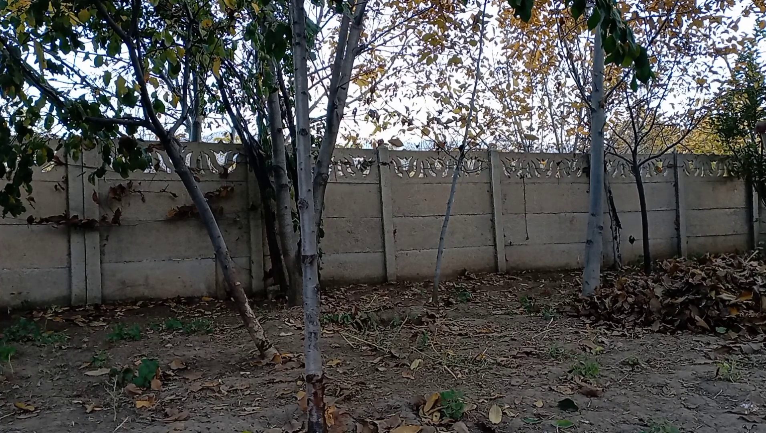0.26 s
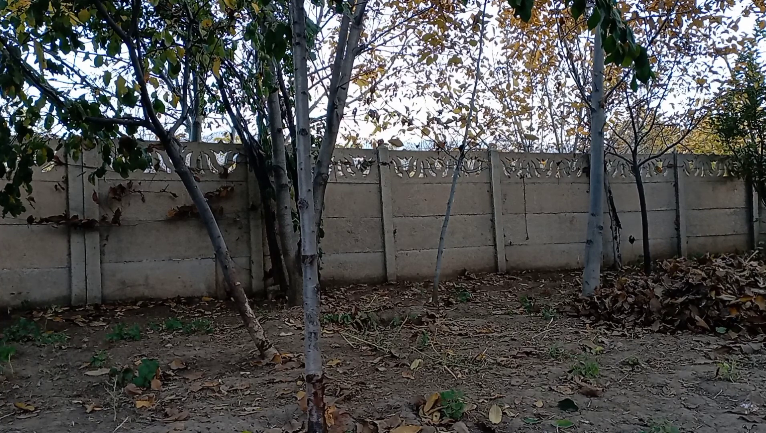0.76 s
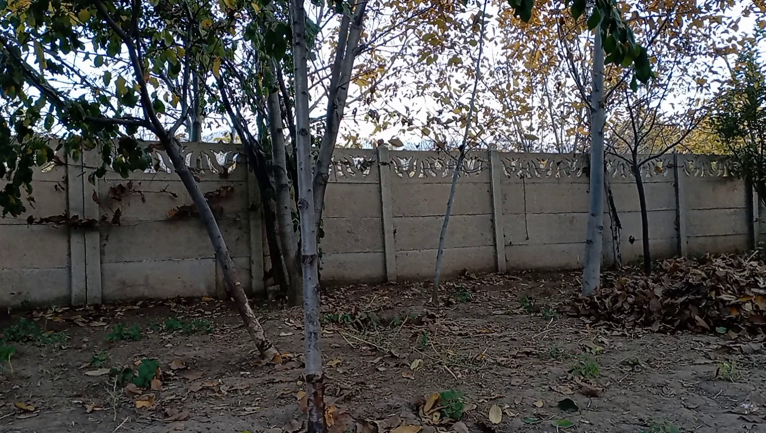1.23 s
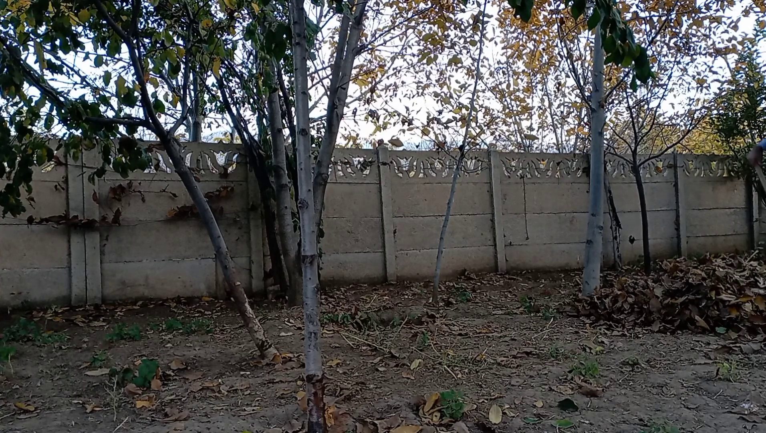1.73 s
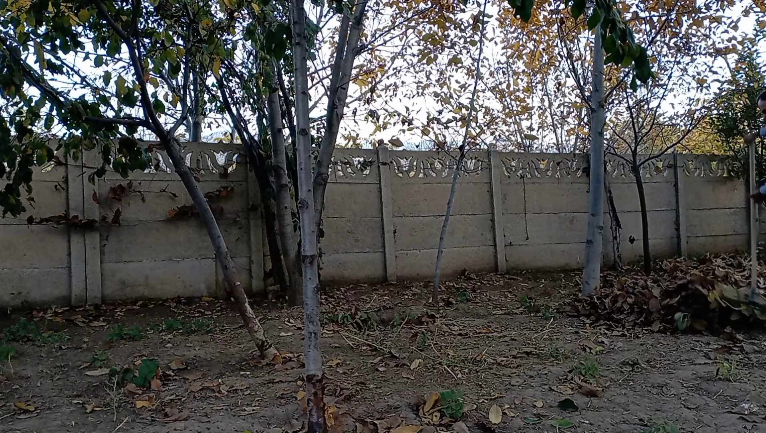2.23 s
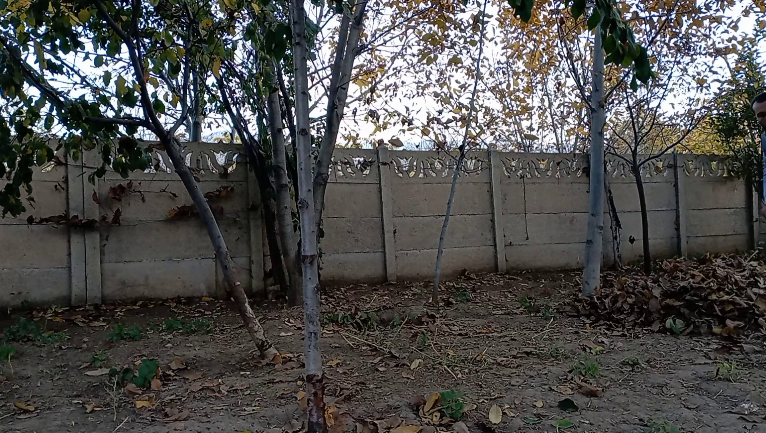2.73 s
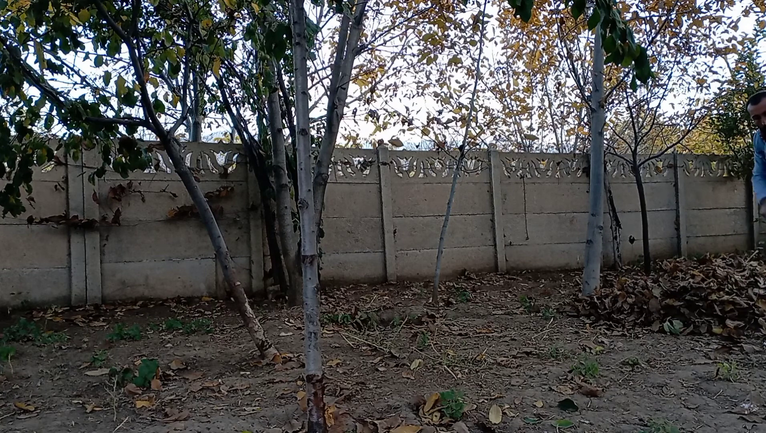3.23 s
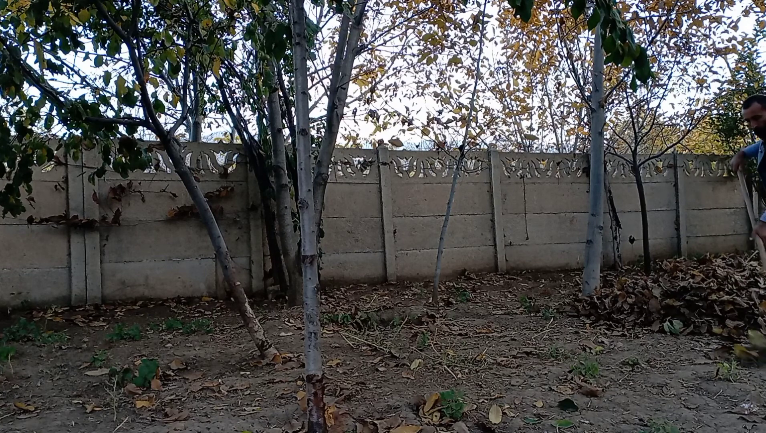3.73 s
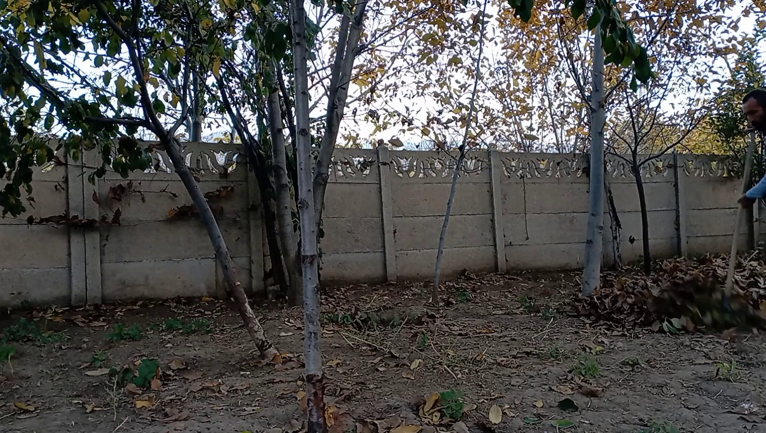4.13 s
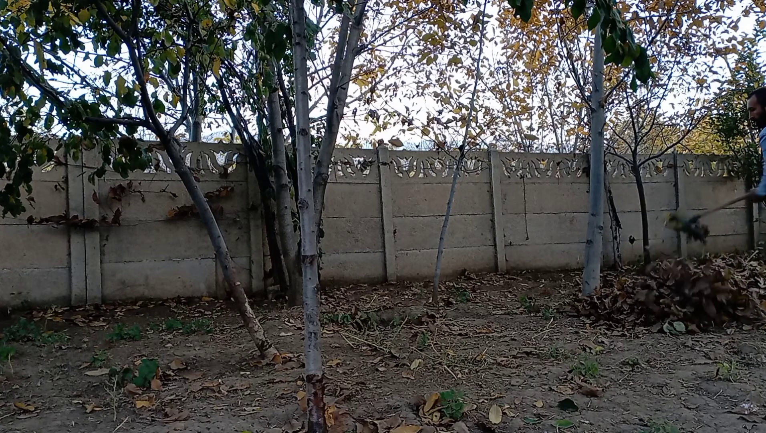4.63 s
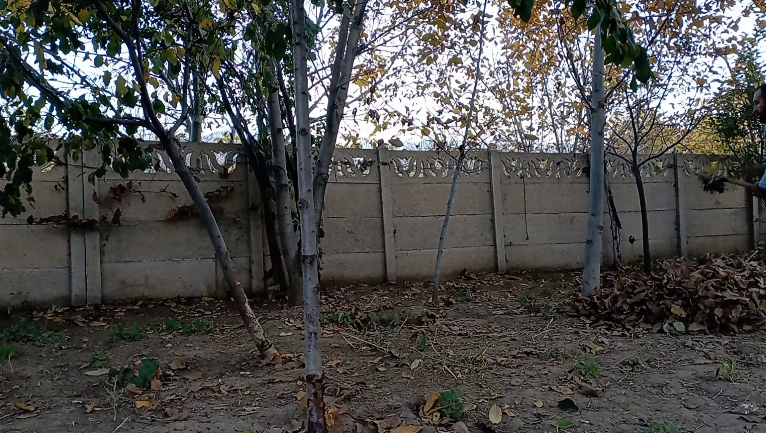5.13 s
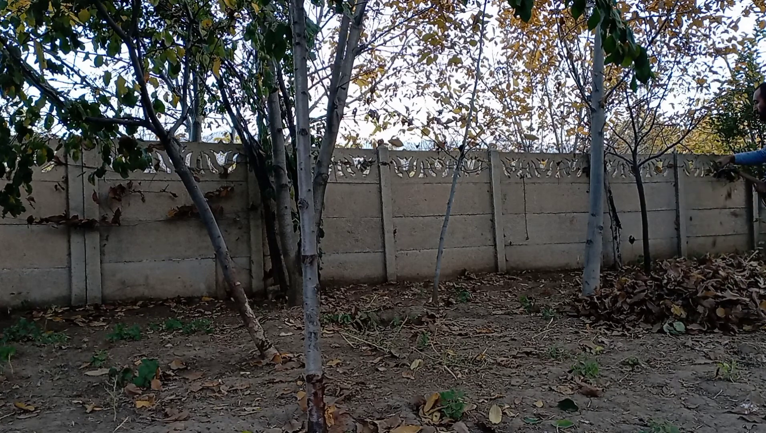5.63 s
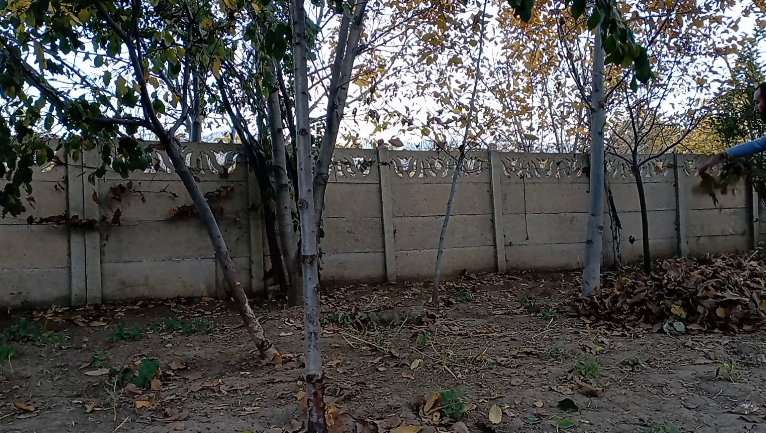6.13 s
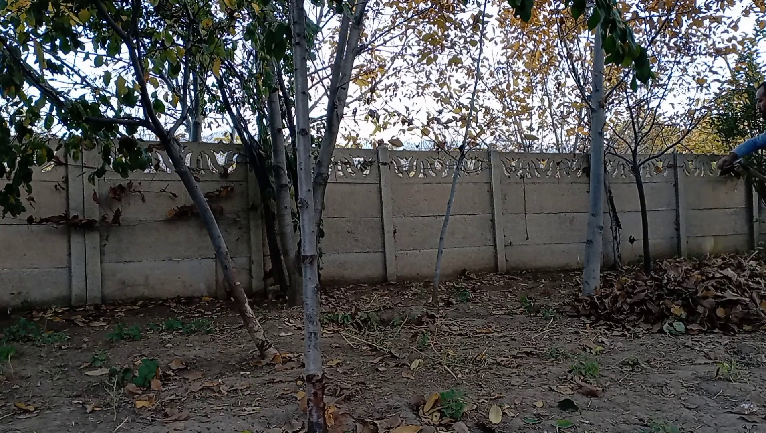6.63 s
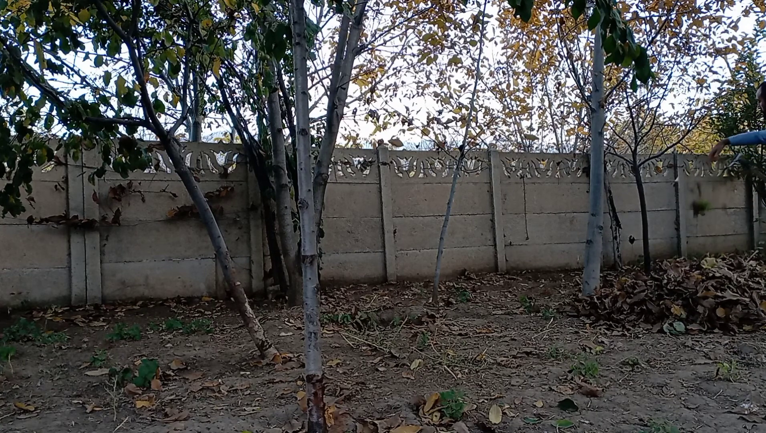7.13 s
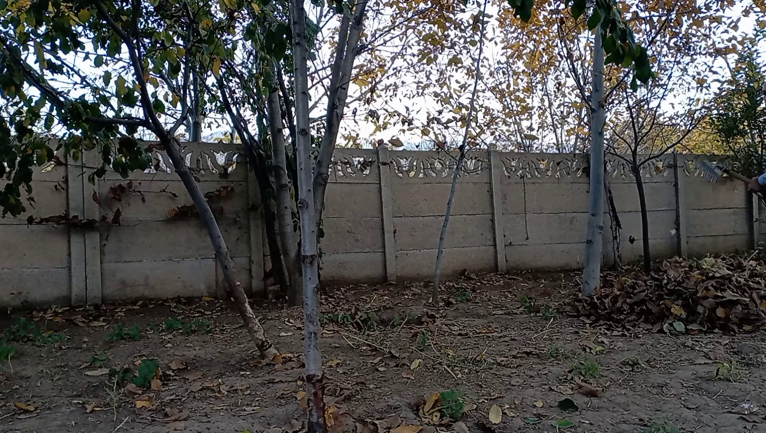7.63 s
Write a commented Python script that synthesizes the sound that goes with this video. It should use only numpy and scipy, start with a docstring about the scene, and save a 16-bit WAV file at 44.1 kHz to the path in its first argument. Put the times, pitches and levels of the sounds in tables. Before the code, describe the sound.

A rake drags dry leaves over bare soil in a walled garden, off to the right. Crisp crackling and thin tine scraping fill the first half second, and stronger strokes return from about 1.2 to 2.5 seconds, with a twig snap at 1.5. Near 1.9 seconds a caught tine rasps and springs free with a bright metallic clink, the loudest sound, with a slight echo. More strokes run from 3 to 4.3 seconds, with small snaps and soft, dull thuds of rake head and boots. From about 4.3 seconds the sound turns quieter: leaves slide back, then handfuls drop onto the heap in short, crackly rustles with tiny snaps until nearly 8 seconds. Faint traffic rumbles far away throughout. A distant engine hums briefly around 2.5 to 3.3 seconds, and a few barely audible hollow tones glide by between 5 and 6.7 seconds.

```python
"""A rake drags dry leaves over bare soil, off to the right in a walled garden; then handfuls drop on
the heap. Countless brittle edges crackle and whole blades crunch, while the tines scrape and sing.
Rake head and boots thud softly, twigs snap, and one caught tine rasps, then springs free with a clink.
Behind the wall far traffic rumbles, an engine hums for a moment and a few faint hollow tones glide by."""
import sys
import numpy as np
from scipy import signal
from scipy.fft import rfft, irfft, next_fast_len
from scipy.io import wavfile
from scipy.ndimage import map_coordinates

SR = 44100
rng = np.random.default_rng(int(sys.argv[2]) if len(sys.argv) > 2 else 0)


def pcm_store(signal):
    """Save signal as 16-bit PCM."""
    levels = np.round(np.clip(np.atleast_2d(signal), -1, 1) * 32767)
    wavfile.write(sys.argv[1], SR, levels.astype(np.int16).T)


N = 346626

# rake strokes [t/s, rise/s, hold/s, fade/(dB/s), leaves/dB, soil/dB, singing over soil/dB]
RAKE_PULLS = [(0.0, 0.0033, 0.12, 55, -46, -63, 7.5), (0.132, .018, 0.026, 54, -44.5, -61, 10),
              (0.218, 0.094, 0.03, 80, -41.5, -58.5, 9), (0.85, .08, .05, 150, -57.5, -73, 7),
              (1.193, .012, .008, 260, -52, -62.5, -2), (1.325, .13, .045, 59, -46.8, -63, 5),
              (1.469, 0.047, 0.17, 84, -43, -58.5, 6), (1.738, 0.097, 0.066, 90, -41, -60, 14),
              (1.899, 0.039, 0.12, 62, -39.5, -56, -3), (2.222, .13, .1, 55, -49, -65.5, 3),
              (2.728, 0.055, 0.024, 88, -56, -72.5, 0), (2.975, 0.062, .02, 80, -58, -74.5, 0.5),
              (3.045, 0.053, 0.029, 225, -48, -65, 4.5), (3.16, 0.066, 0.3, 25, -45, -63, 8.5),
              (3.373, .02, .015, 220, -45, -71, 7), (3.527, 0.17, 0.037, 128.5, -46.5, -61.5, 10.5),
              (3.818, 0.04, 0.034, 148, -43, -59, 1.5), (3.908, .05, 0.022, 66, -41.5, -58.5, 2),
              (3.984, 0.11, 0.033, 35, -39.5, -58, 1.5)]
# leaves sliding back or dropped [t/s, rise/s, hold/s, fade/(dB/s), crackle/dB, ground brush/dB]
LEAF_FALLS = [(0.42, 0.071, .02, 20, -52, -70.5), (1.09, .08, .1, 50, -61, -77),
              (4.27, 0.18, 0.47, 62, -52, -70), (5.1, 0.045, 0.094, 21.5, -62, -79),
              (5.498, .032, .018, 79, -50.3, -70), (5.68, 0.013, 0.32, 77, -51, -72.5),
              (6.28, .075, .02, 65, -61.5, -78), (6.495, 0.025, 0.15, 66, -52.5, -78),
              (6.72, 0.01, 0.027, 68, -52, -75), (6.97, 0.026, 0.019, 128, -62, -77),
              (7.2, .015, 0.024, 130.5, -69.5, -82), (7.378, 0.037, 0.033, 151, -54, -75.5),
              (7.51, 0.022, 0.015, 80, -54.5, -70.5)]
# EQ curves of leaf edges, crunch, soil, traffic, bright crack and tine rattle [f/Hz, level/dB]
EDGE_EQ = [(2000, -53.5), (4500, -14), (6000, -8.5), (7500, -5), (9000, -1.5), (10200, 0), (11500, -6),
           (13500, -10), (15800, -14)]
CRUNCH_EQ = [(300, -23), (1200, -9), (2000, -6), (3000, -2.5), (4500, -2.5), (6000, -4), (9000, -27),
             (15000, -39)]
SOIL_EQ = [(30, -30), (70, -17), (130, -3), (280, 0.5), (500, -2), (800, -6.5), (1300, -11), (2000, -6.5),
           (4000, -28.5), (9000, -47)]
TRAFFIC_EQ = [(20, -32), (32, -20.5), (48, -7.5), (90, 2.5), (160, -1), (280, -2), (450, -10), (800, -20),
              (1600, -27), (5000, -25.5), (15000, -39)]
CRACK_EQ = [(1000, -20), (2200, -19.5), (3800, -7.5), (5700, -9), (7200, 8), (10800, 6.5), (12500, 2),
            (15800, -7.5)]
RATTLE_EQ = [(700, -38.5), (1800, -13.5), (2700, -26.5), (3800, -12), (5700, -12), (7000, -3.5),
             (11000, 0.5), (13000, 0), (15800, -9)]
# resonances of the dragging tines [f/Hz, width/Hz, level/dB]
DRAG_MODES = [(3680, 590, -7.5), (7020, 420, 1), (7450, 250, -4.5), (8400, 220, 2.5), (12300, 900, -13)]
# partials of a far engine [f/Hz, level/dB]
ENGINE_PARTIALS = [(150.7, -67.5), (226.1, -77.5), (301.5, -81)]
# rake head and boots meeting the ground [t/s, level/dB, f/Hz, t60/s]
THUDS = [(0.83, -68.5, 500, 0.18), (1.203, -55.5, 407, 0.058), (1.53, -56, 200, .22),
         (2.99, -66, 480, 0.085), (3.265, -54, 230, 0.17), (3.5, -61, 150, 0.37), (3.87, -61, 140, 0.44),
         (4.07, -62, 132, 0.37), (4.605, -64, 400, .1), (4.728, -53.5, 750, 0.037),
         (6.087, -54.5, 268, 0.071), (6.127, -56.5, 190, 0.13), (7.21, -68, 130, 0.28)]
# dry snaps and, at 1.847 s, a short, dull rasp as the tine slips, just before the clink
# [t/s, level/dB, relative body level/dB, f/Hz, t60/s]
SNAPS_AND_RASP = [(0.9869, -31.5, -10, 7080, .013), (1.5, -25.5, -29, 9150, 0.016),
                  (1.847, -35.5, -0.5, 3900, 0.094), (2.704, -43, -13, 7700, 0.0094),
                  (2.8135, -39.5, -16, 10100, .007), (3.0745, -39, -19, 9870, .02),
                  (3.2156, -37, -13, 9800, 0.024), (3.284, -28.5, -19, 9550, .008),
                  (3.3395, -32.5, -15, 9630, .06), (3.492, -31, -16, 10500, .008),
                  (5.4192, -40.5, -9, 8150, .009), (5.686, -45, -19, 8800, .02),
                  (5.7366, -39, -6, 9940, .008), (5.76, -41, -8, 9300, 0.016),
                  (5.9844, -34, -12, 10000, 0.0088), (6.467, -46, -13, 9300, .014),
                  (6.4976, -51, -16, 9800, .035), (6.509, -45.5, -12, 4650, .035),
                  (6.553, -43, -22, 10300, 0.08), (6.6655, -33, -23, 9400, .005),
                  (6.7237, -43, -20, 3730, 0.022), (6.9297, -47.5, -11, 9900, .018),
                  (7.177, -55, -4, 4560, 0.01), (7.2188, -50, -24, 9650, 0.018),
                  (7.385, -51.5, -6, 9600, 0.019)]
# decay of the garden's echo [f/Hz, t60/s]
ECHO_DECAY = [(200, .3), (3000, 0.38), (12000, 0.25)]
# a tine slips, then springs free [t/s, level/dB, rise/s, relative rattle level/dB, rattle t60/s]
CLINKS = [(1.842, -14.5, 0.011, -10.5, 0.031), (1.914, -13, 0.00027, -2, 0.091)]
# ring of the freed tine [f/Hz, level/dB, t60/s]
CLINK_MODES = [(1950, -13, .06), (3600, -15, .05), (4100, -13, .06), (6850, -5, .04), (7130, -3, .06),
               (7330, -5, .05), (7710, -5, .05), (8210, -1, .07), (8400, 4, .012), (10370, -5, .05),
               (10620, -3, .045), (10840, -7, .08), (11150, -7, .08), (11300, -3, .06), (12010, -9, .045),
               (12360, -6, .06), (13550, -10, .035), (14640, -13, .06)]
# hollow tones far away [t/s, length/s, start f/Hz, end f/Hz, level/dB]
GLIDES = [(5.021, 0.15, 426, 350, -69.5), (5.292, 0.076, 332, 295, -66), (5.548, 0.088, 243, 225, -63.5),
          (5.68, 0.085, 340, 374, -65.5), (6.248, 0.095, 402, 280, -66.5), (6.613, 0.086, 308, 262, -65.5)]
# sound common to both microphone ports [f/Hz, share of power]
COMMON_SHARE = [(100, .9), (1500, .86), (2800, .45), (7000, .42), (11000, .26), (15000, .17)]
# where the rake works, heard as a delay at the left port [t/s, lag/ms]
LEFT_LAG = [(0, .275), (1.6, .29), (2.3, .24), (3.4, .275), (4.0, .23), (4.6, .21), (7.8, .205)]
# tone difference between the ports [f/Hz, left minus right level/dB]
PORT_BALANCE = [(700, -.5), (3500, -1.5), (6000, -1.6), (8600, -5), (9700, -4), (10700, 1), (12000, 0),
                (15000, -1.5)]

TOP_HZ = 15850  # band limit


def amp(db):
    """Decibels to gain."""
    return 10 ** (np.asarray(db) / 20)


def unit(x):
    """Scale to rms 1."""
    return x / np.sqrt(np.mean(x ** 2) + 1e-20)


def along(points, hz):
    """Read a curve on a log frequency axis."""
    f, values = np.transpose(points)
    return np.interp(np.log(hz + 1), np.log(f + 1), values)


def wobble(rate):
    """A smooth random curve, rate knots a second."""
    knots = rng.standard_normal(int(N * rate / SR) + 4)
    return map_coordinates(knots, [np.arange(N) * rate / SR])


def filtered(x, response):
    """Filter x by a gain given as a function of frequency."""
    size = next_fast_len(N + SR // 2)
    return irfft(rfft(x, size) * response(np.fft.rfftfreq(size, 1 / SR)), size)[..., :N]


def coloured(x, eq):
    """EQ white sound and keep its power."""
    return filtered(x, lambda hz: unit(amp(along(eq, hz))))


def swell(start, rise, hold, fade_db_per_s):
    """Envelope of one gesture: it builds, holds and dies away."""
    t = np.arange(N) / SR - start
    return np.clip(t / rise, 0, 1) * amp(-fade_db_per_s * np.maximum(t - rise - hold, 0))


def envelopes(gestures):
    """One envelope for each level column; overlapping gestures add in power."""
    shapes = np.array([swell(*row[:4]) for row in gestures])
    gains = amp([row[4:] for row in gestures])
    return np.sqrt(gains.T ** 2 @ shapes ** 2)


def grains(rate, spread_db):
    """Three streams of tiny clicks, random in timing and size, rms 1."""
    happens = rng.random((3, N)) < rate / SR
    sizes = amp(spread_db * np.clip(rng.standard_normal((3, N)), -3, 3))
    return unit(happens * sizes * rng.choice([-1, 1], (3, N)))


def leaf_ticks(rate, centre_hz, scatter, cycles, spread_db):
    """Three streams of single leaves flicking, each ringing briefly at its own pitch, rms 1."""
    count = int(3 * rate * N / SR)
    starts = (rng.random((count, 1)) * 3 * N).astype(int)
    detune, size = np.hsplit(np.clip(rng.standard_normal((count, 2)), -2.5, 2.5), 2)
    hz = np.minimum(centre_hz * np.exp(scatter * detune), TOP_HZ)
    age = np.arange(SR // 150)
    turns = hz * age / SR
    rings = amp(spread_db * size) * np.exp(-turns / cycles) * np.sin(2 * np.pi * turns)
    track = np.bincount((starts + age).ravel(), rings.ravel(), 3 * N)
    return unit(track[:3 * N].reshape(3, N))


def leaves(dragged, falling):
    """Brittle edges crackle and whole blades crunch, in clumps as leaves catch and let go."""
    stir = amp(-76.5)  # the leaves never quite lie still
    moving = np.sqrt(dragged ** 2 + falling ** 2 + stir ** 2)
    clumps = amp(0.75 * wobble(35) + 0.31 * wobble(420) + 0.53)
    # the fewer leaves are moving, the more each single one stands out
    solo = amp(np.clip(-.3 * (20 * np.log10(moving) + 46), -3, 4))
    rib_cracks = solo * amp(-11) * grains(rate=110, spread_db=1.5)
    edges = coloured(grains(rate=9000, spread_db=3.5) + rib_cracks, EDGE_EQ)
    edges += solo * amp(-9) * leaf_ticks(rate=360, centre_hz=9780, scatter=.11, cycles=16, spread_db=5)
    blades = coloured(grains(rate=7000, spread_db=3.5) + rib_cracks, CRUNCH_EQ)
    blade_ticks = leaf_ticks(rate=200, centre_hz=4123, scatter=.284, cycles=20, spread_db=3.5)
    blades += solo * amp(-8.5) * blade_ticks
    return clumps * moving * (edges + amp(-9.5) * blades)


def soil_scrape(pressure, bite):
    """The tines bump over crumbs of soil, louder the harder they are pressed, and sing as they bite."""
    def steel(f):
        modes = (amp(db) * f * width / (hz ** 2 - f ** 2 + 1j * f * width)
                 for hz, width, db in DRAG_MODES)
        return unit(abs(sum(modes)))

    crumbs = grains(rate=2500, spread_db=5.5) * pressure * amp(1.23 * wobble(45) + 4)
    slips = grains(rate=3000, spread_db=3) * bite
    return coloured(crumbs, SOIL_EQ) + filtered(slips, steel)


def traffic():
    """A low, uneven bed of rumble from beyond the wall; one engine hums out of it for a moment."""
    level = amp(-66.5 + 0.9 * wobble(16))
    centre, *sides = coloured(rng.standard_normal((3, N)) * level, TRAFFIC_EQ)
    clock = np.cumsum(1 + 0.0076 * wobble(13)) / SR  # the pitch wavers
    hum = sum(amp(db) * np.sqrt(2) * np.sin(2 * np.pi * hz * clock) for hz, db in ENGINE_PARTIALS)
    hum *= swell(start=2.47, rise=0.15, hold=0.52, fade_db_per_s=65)
    return centre + amp(-8) * np.array(sides) + hum


def leaf_landings(falling):
    """Among the falling leaves a few stiff ones land edge first, each with a tick of its own."""
    edges = leaf_ticks(rate=76, centre_hz=9700, scatter=.13, cycles=14, spread_db=6.5)
    stems = leaf_ticks(rate=40, centre_hz=4320, scatter=.23, cycles=5.5, spread_db=2)
    return amp(-9.5) * falling * (edges + amp(-7) * stems)


def ground_thuds():
    """Soft ground deadens each blow of rake head or boot to a short, dull puff."""
    out, t = np.zeros(N + SR), np.arange(SR // 4) / SR
    for start, db, hz, t60 in THUDS:
        band = signal.butter(2, [hz / 1.6, hz * 1.6], "bandpass", fs=SR)
        envelope = amp(-60 * t / t60) * (1 - np.exp(-t / 0.003))
        puff = signal.lfilter(*band, envelope * rng.standard_normal(len(t)))
        makeup_gain = np.sqrt(SR / (2 * hz))
        out[round(start * SR):][:len(t)] += amp(db + 3) * makeup_gain * puff
    return out[:N]


def snaps_and_rasp():
    """Each snap, and the slipping tine's rasp, layers a bright crack, a duller body and a brief ring."""
    crack, body, ring = np.zeros((3, 3, N + SR))
    t = np.arange(SR // 16) / SR
    for start, db, body_db, hz, t60 in SNAPS_AND_RASP:
        envelope = amp(db - 60 * t / t60) * (1 - np.exp(-t / 0.00025))
        span = slice(round(start * SR), round(start * SR) + len(t))
        crack[:, span] += envelope * rng.standard_normal((3, len(t)))
        body[:, span] += amp(body_db) * envelope * rng.standard_normal((3, len(t)))
        ring[0, span] += envelope * np.sin(2 * np.pi * hz * t)
    return amp(0.5) * (coloured(crack, CRACK_EQ) + ring[:, :N]) + coloured(body, CRUNCH_EQ)


def garden_echo(x):
    """Wall and trunks return a thin, diffuse echo."""
    hz, t, noise = signal.stft(rng.standard_normal((2, SR // 2)), SR, nperseg=256)
    decay = amp(-60 * t / along(ECHO_DECAY, hz)[:, None])
    _, tail = signal.istft(noise * decay, SR, nperseg=256)
    return signal.fftconvolve(x, tail / np.linalg.norm(tail[0]), axes=1)[:, :N]


def tine_clink():
    """A springy tine rattles against its neighbours and rings briefly."""
    ring, rattle = np.zeros((2, 3, N + SR))
    t = np.arange(SR // 4) / SR
    for start, db, rise, rattle_db, rattle_t60 in CLINKS:
        span = slice(round(start * SR), round(start * SR) + len(t))
        attack = amp(db) * (1 - np.exp(-t / rise))
        for hz, mode_db, t60 in CLINK_MODES:
            partial = np.sin(2 * np.pi * (hz * t + rng.random()))
            ring[0, span] += attack * amp(mode_db - 5 - 60 * t / t60) * partial
        rattle_envelope = attack * amp(rattle_db - 60 * t / rattle_t60)
        rattle[:, span] += rattle_envelope * rng.standard_normal((3, len(t)))
    return ring[:, :N] + coloured(rattle, RATTLE_EQ)


def far_tones():
    """Soft low glides, blurred by distance, barely above the rumble."""
    out, blur = np.zeros(N), 0.5 * wobble(60)
    for start, length, start_hz, end_hz, db in GLIDES:
        span = slice(round(start * SR), round((start + length) * SR))
        progress = np.linspace(0, 1, len(out[span]))
        phase = 2 * np.pi * np.cumsum(start_hz + (end_hz - start_hz) * progress) / SR
        out[span] += amp(db + 3) * np.sin(np.pi * progress) * np.sin(phase + blur[span])
    return out


def place_right(streams):
    """Stream 0 comes straight from the right, late at the left port; 1 and 2 scatter, one to each."""
    samples = np.arange(N)
    lag_ms = np.interp(samples / SR, *np.transpose(LEFT_LAG))
    right = filtered(streams[0], lambda hz: np.sqrt(along(COMMON_SHARE, hz)))
    left = map_coordinates(right, [samples - lag_ms * SR / 1000])
    scattered = filtered(streams[1:], lambda hz: np.sqrt(1 - along(COMMON_SHARE, hz)))
    return np.array([left, right]) + scattered


def scene():
    """Rustle, scrape and thuds over the far bed; only snaps, rasp and clink feed the echo."""
    pulls = [(*gesture, soil_db, soil_db + sing_db) for *gesture, soil_db, sing_db in RAKE_PULLS]
    dragged, pressure, bite = envelopes(pulls)
    falling, brushing = envelopes(LEAF_FALLS)
    rustle = leaves(dragged, falling) + leaf_landings(falling)
    scrape = soil_scrape(np.hypot(pressure, brushing), bite)
    accents = snaps_and_rasp() + tine_clink()
    foreground = place_right(rustle + scrape + accents) + ground_thuds()
    return foreground + amp(-10.5) * garden_echo(accents[:1]) + traffic() + far_tones()


def record(dry):
    """The two ports resonate at slightly different pitches; nothing passes above the band limit."""
    side = np.array([[.5], [-.5]])
    return filtered(dry, lambda hz: amp(side * along(PORT_BALANCE, hz)) * (hz < TOP_HZ))


dry = scene()
out = record(dry)
pcm_store(out)
```